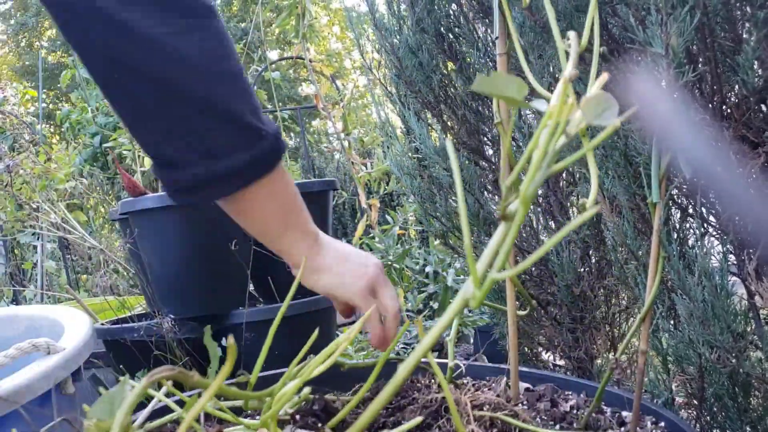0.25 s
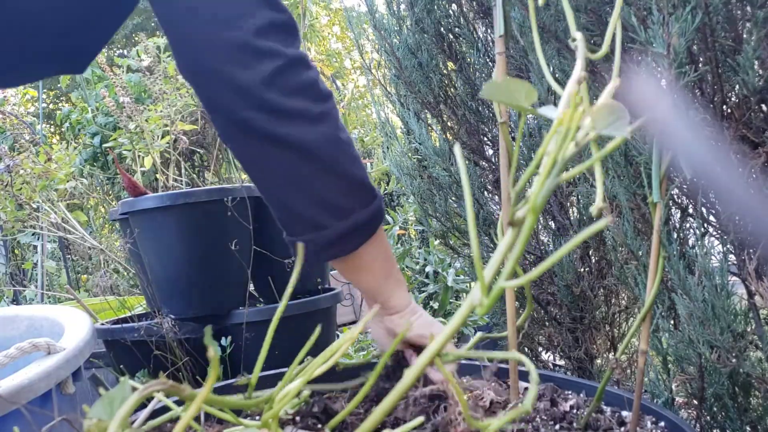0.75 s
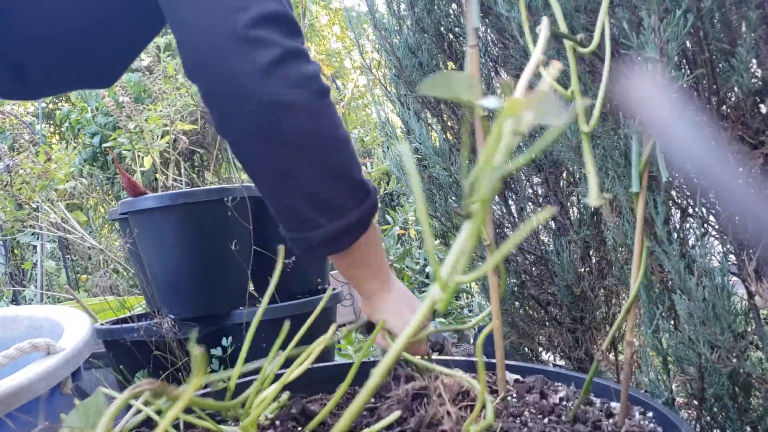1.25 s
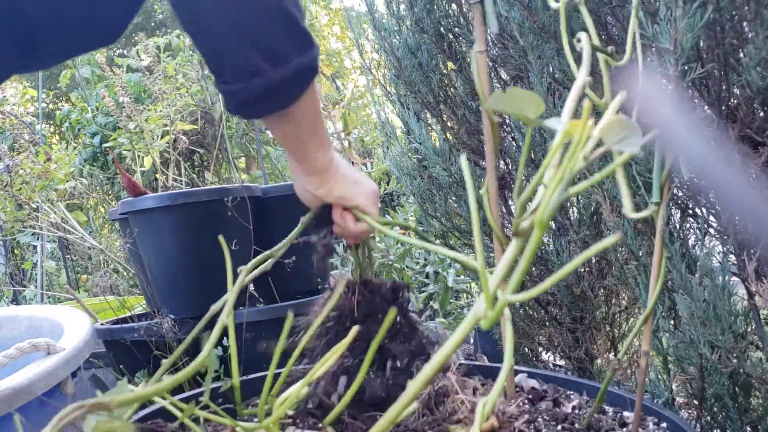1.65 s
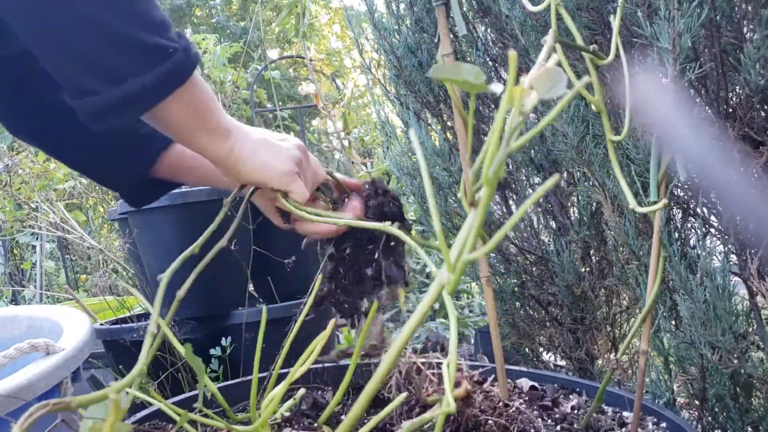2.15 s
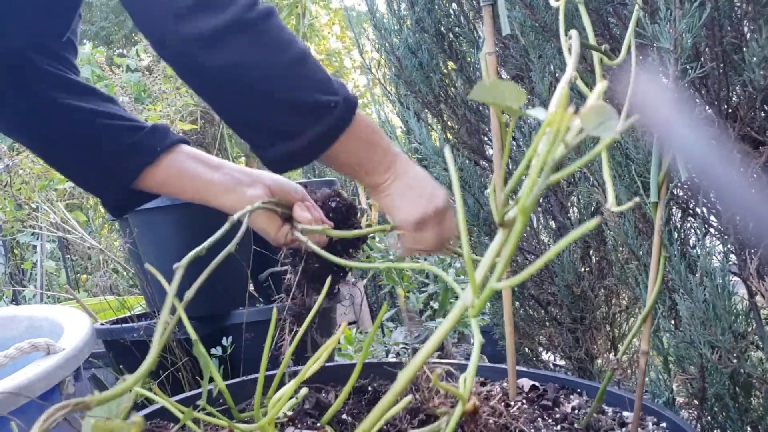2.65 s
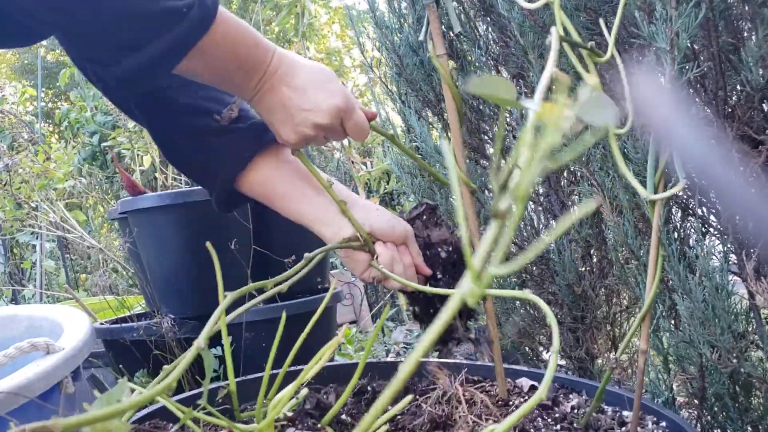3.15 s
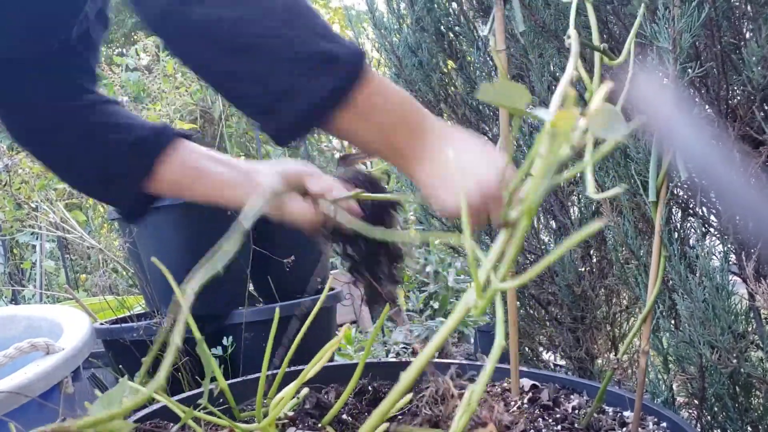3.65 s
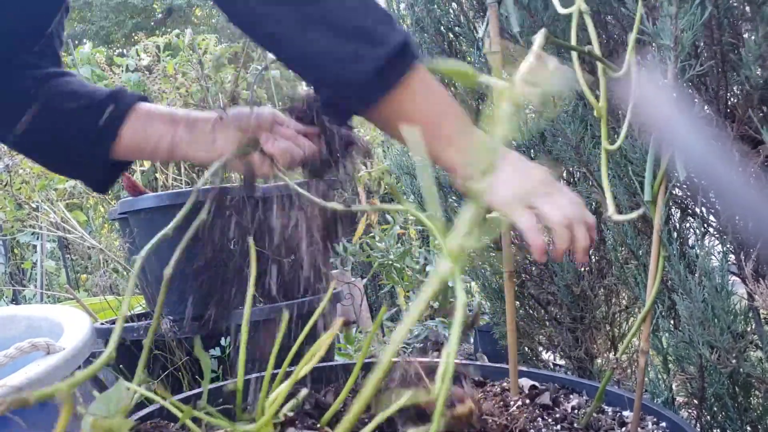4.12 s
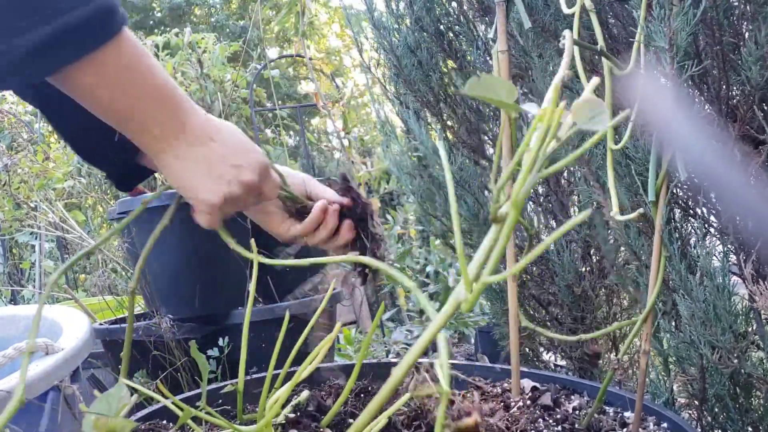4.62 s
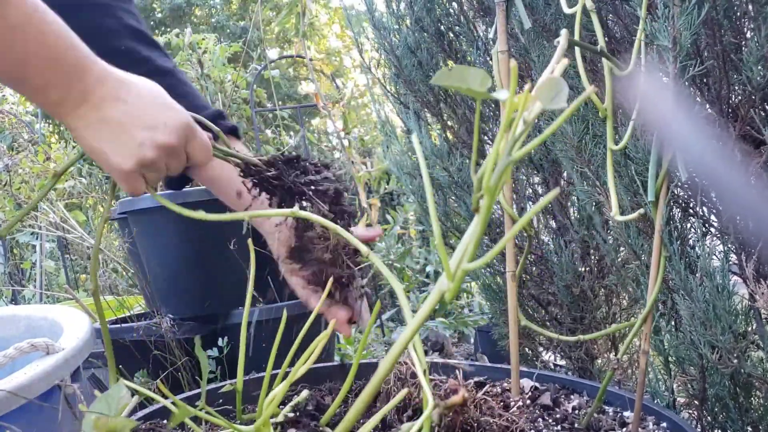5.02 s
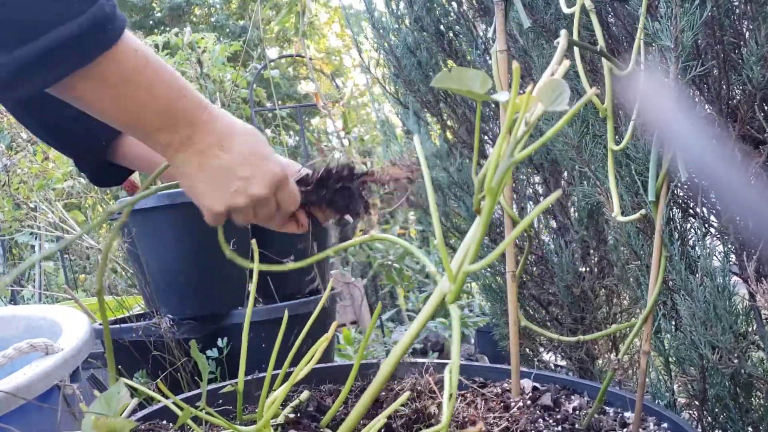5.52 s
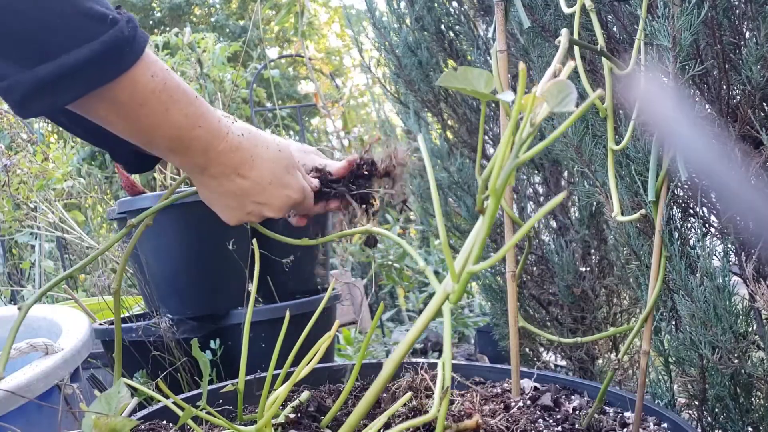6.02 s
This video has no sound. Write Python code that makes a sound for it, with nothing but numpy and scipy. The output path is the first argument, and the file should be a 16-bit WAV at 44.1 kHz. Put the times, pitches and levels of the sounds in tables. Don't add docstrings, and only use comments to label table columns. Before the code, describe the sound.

Outdoors in a garden, a stereo microphone sits close to a soil tub. A distant engine drones steadily over faint town murmur. Leaves rustle as hands grip, then roots snap and earth crumbles, with clods knocking. Wind bumps the right side midway; a hard crack and busy shaking follow, easing into light picking.

```python
import sys
import numpy as np
from scipy import signal
from scipy.fft import rfft, irfft
from scipy.io import wavfile
from scipy.ndimage import uniform_filter1d

SR = 44100
rng = np.random.default_rng(int(sys.argv[2]) if len(sys.argv) > 2 else 0)


def store_wav(level_fs):
    pcm = np.round(np.clip(np.atleast_2d(level_fs), -1, 1) * 32767)
    wavfile.write(sys.argv[1], SR, pcm.T.astype(np.int16))


def voltage_ratio(decibels):
    exponent = np.asarray(decibels, float) / 20
    return 10 ** exponent


N = 276948

# frequency in Hz, level in dB per Hz.
LEAF_LEFT = [(500, 16.5), (900, -17), (1500, -9), (2300, -12.5), (3300, -7.5), (4300, -9), (5900, -12),
             (6800, -1), (8400, -12), (10000, -1.5), (12000, 2), (13500, 2.5), (15500, -2.5)]
# frequency in Hz, level in dB per Hz.
LEAF_RIGHT = [(500, 13), (900, -21), (1500, -12), (2300, -13.5), (3300, -5), (4300, 0), (5900, 2),
              (6800, -0.5), (8400, -21), (10000, -9.5), (12000, 0), (13500, -32.5), (15500, 2)]


def rms_one(x):
    return x / np.sqrt(np.mean(x ** 2) + 1e-20)


def in_time(rows):
    s, *columns = np.transpose(rows)
    return [np.interp(np.arange(N) / SR, s, column) for column in columns]


def at_hz(points, hz):
    point_hz, point_db = np.transpose(points)
    return np.interp(np.log(hz), np.log(point_hz), point_db)


def drift(rate):
    r = np.exp(-80 * np.pi * rate / SR)
    slow = signal.lfilter([1], [1, -2 * r, r * r], rng.standard_normal(N // 40 + 2002))[2000:]
    return np.interp(np.arange(N) / 40, np.arange(len(slow)), rms_one(slow))


def causal(points, size):
    hz = np.arange(size + 1) * SR / 2 / size + 1
    cepstrum = irfft(np.log(voltage_ratio(at_hz(points, hz))))
    cepstrum[1:size] *= 2
    cepstrum[size + 1:] = 0
    return irfft(np.exp(rfft(cepstrum)))[:size]


def ports(x, left, right, size=256):
    responses = [causal(left, size), causal(right, size)]
    return signal.oaconvolve(x, responses, axes=1)[:, :x.shape[1]]


def band(x, low_hz, high_hz, order=3):
    edges_hz = [low_hz, min(high_hz, .45 * SR)]
    return signal.sosfilt(signal.butter(order, edges_hz, "band", fs=SR, output="sos"), x)


def add(out, sound, s):
    i = round(s * SR)
    out[:, i:i + sound.shape[1]] += sound[:, :N - i]


def sides(db):
    return voltage_ratio(np.array([[db / 2], [-db / 2]]))


def swells(rows, rise, sag, fall):
    s, hold, db = np.transpose(rows)[:3, :, None]
    age = np.arange(0, N + 64, 64) / SR - s
    rising = rise * np.minimum(age, 0)
    sagging = sag * np.clip(age, 0, hold)
    falling = fall * np.maximum(age - hold, 0)
    return voltage_ratio(db + rising - sagging - falling)


def blend(gains):
    total = np.sqrt(np.sum(gains ** 2, axis=0))
    return np.interp(np.arange(N) / 64, np.arange(len(total)), total)


def engine():
    # time in seconds, speed as 12th order in Hz, firing level in dB.
    running = [(0.0, 299.2, -41), (0.5, 300.1, -39.5), (1.0, 296.6, -43), (1.25, 298.4, -40),
               (1.75, 293.0, -39.5), (2.25, 298.5, -36.5), (2.75, 297.5, -38), (3.0, 294.0, -40),
               (3.5, 295.3, -38.5), (3.75, 297.2, -36), (4.0, 294.7, -39), (4.5, 300.1, -35),
               (5.0, 305.1, -39), (5.25, 306.2, -47.5), (5.5, 304.0, -46.5), (5.75, 301.1, -39.5),
               (6.0, 301.0, -40.5), (6.28, 303.8, -44.5)]
    # order number, level in dB.
    steady_orders = [(2, -49.5), (5, -48), (6, -52), (7, -55), (10, -93), (13, -66.5), (14, -70.5),
                     (15, -72)]
    # order number, level in dB, depth of fading on the way in dB,
    # share of the firing swing, slope in dB per Hz of overspeed.
    fading_orders = [(3, -52, 1.5, -0.5, -1), (8, -47.5, 1.5, -1.08, -2.5), (9, -64.5, 2.5, 0.96, 2.07),
                     (12, -55, 1.0, 0.13, 0.53)]
    # frequency in Hz, left minus right in dB.
    port_balance = [(50, 6), (170, -1), (215, 11), (260, 8), (300, -1.5), (330, 5)]
    wander_db, lag_rad = 1.0, 0.22
    pipe_top_hz = 299.3

    top_hz, firing_db = in_time(running)
    turn = 2 * np.pi * np.cumsum(top_hz / 12) / SR
    over_hz = np.maximum(top_hz - pipe_top_hz, 0)
    firing_swing_db = firing_db - firing_db.mean()
    orders = steady_orders + [(4, firing_db)]
    for k, db, depth_db, share, slope in fading_orders:
        orders.append((k, db + depth_db * drift(1.2) + share * firing_swing_db + slope * over_hz))

    out = np.zeros((2, N))
    for k, db in orders:
        hz = k * np.mean(top_hz) / 12
        phase = k * turn + np.pi * (k % 4 == 0) + .09 * min(k, 5) * drift(1.5)
        level = np.sqrt(2) * voltage_ratio(db + wander_db * drift(2.14))
        right_gain = voltage_ratio(-at_hz(port_balance, hz))
        out += level * np.sin([phase, phase + lag_rad]) * [[1], [right_gain]]
    return out


def town():
    # frequency in Hz, level in dB per Hz.
    town_left = [(30, 1), (80, 12), (130, 2.5), (300, 2.5), (500, -9), (1000, -21.5), (1450, -10.5),
                 (2300, -27.5), (4300, -35), (6800, -23.5), (8400, -41), (12000, -30.5), (15500, -23)]
    # frequency in Hz, level in dB per Hz.
    town_right = [(30, -8), (80, 21.5), (130, 8.5), (300, 6.5), (500, -12), (1000, -23), (1450, -24),
                  (2300, -25.5), (4300, -17.5), (5900, -22.5), (8400, -96), (12000, -49), (15500, -38)]
    own, shared = rng.standard_normal((2, N)), rng.standard_normal(N)
    low, high = (signal.butter(1, 900, kind, fs=SR) for kind in ("low", "high"))
    air = signal.lfilter(*low, 0.65 * shared + 0.26 * own) + signal.lfilter(*high, own)
    return voltage_ratio(-36) * ports(air, town_left, town_right, size=4096)


def grains(per_s, spread_db, clump_db, count=7):
    heights = voltage_ratio(spread_db * np.minimum(rng.exponential(1, N), 3.3))
    sizes = heights * (rng.random(N) < per_s * voltage_ratio(clump_db * drift(25)) / SR)
    dealt = rng.integers(0, count, N)
    out, t = 0, np.arange(600) / SR
    for k, t60 in enumerate(np.geomspace(.001, .011, count)):
        scatter = rng.standard_normal((2, 600)) * voltage_ratio(-60 * t / t60)
        scatter = rms_one(signal.lfilter([1, 0.95 * (-1) ** k], [1], scatter))
        out = out + signal.oaconvolve((sizes * (dealt == k))[None], scatter, axes=1)[:, :N]
    return rms_one(out)


def rustle():
    # full strength at seconds, hold in seconds, effort in dB,
    # leaf brightness in dB.
    hands = [(0.0, 0.16, -64, 11.5), (0.247, 0.17, -63, -5.5), (0.56, 0.07, -56, 4.5),
             (0.666, 0.089, -45.5, 5), (0.776, 0.082, -53.5, 8.5), (0.91, 0.062, -63, 3),
             (1.03, 0.36, -65, 6), (1.297, 0.013, -51.5, 2.5), (1.378, 0.19, -56.5, 3.5),
             (1.51, 0.24, -56.5, 5), (1.79, 0.18, -55.5, 3), (2.065, 0.082, -55.5, 0.5),
             (2.218, 0.17, -62, 4.5), (2.522, 0.051, -67.5, 3.5), (2.747, 0.088, -53.5, 4),
             (2.942, 0.043, -65, 6.5), (3.071, 0.13, -61.5, 7), (3.33, 0.029, -70.5, 9.5),
             (3.558, 0.049, -65, 4.5), (3.71, 0.13, -68.5, 8), (3.915, 0.047, -54.5, 8.5),
             (4.019, 0.12, -55, 6.5), (4.2, 0.13, -50.5, 6), (4.384, 0.077, -54, 8), (4.524, 0.13, -53, 7),
             (4.67, 0.16, -57.5, 6.5), (4.872, 0.19, -64.5, 7), (5.295, .05, -60.5, 6.5),
             (5.37, 0.013, -56.5, 8), (5.523, 0.035, -61, 6)]
    # full
    # strength at seconds, hold in seconds, # effort in dB, leaf brightness in dB.
    picking = [
        (2.407, 0.33, -68.5, -4),
        (3.24, 0.32, -71, 2.5),
        (5.076, .2, -76.5, 10.5),
        (5.44, .04, -66, -1),
        (5.615, 0.17, -67, 4),
        (5.86, 0.44, -71, 4),
    ]
    moves = swells(hands + picking, rise=337, sag=0.5, fall=172)
    leafy_db = np.array(hands + picking)[:, -1:]
    effort = voltage_ratio(0.8) * blend(moves)
    bright = blend(moves * voltage_ratio(leafy_db - 0.3))
    body = blend(moves * voltage_ratio(0.12 * leafy_db - 8.0))

    hiss = rng.standard_normal((2, N)) * voltage_ratio(1.8 * drift(20) + 2.2 * drift(80))
    ticking = grains(1600, spread_db=4.6, clump_db=4.5)
    raw = ports(ticking + 0.8 * hiss, LEAF_LEFT, LEAF_RIGHT)
    out = effort * rms_one(band(raw, 2600, 8400))
    out += bright * rms_one(band(raw, 8400, 17500))
    crumbs = np.tanh(.7 * rms_one(band(raw, 1100, 2600)))
    return out + body * rms_one(crumbs)


def soil():
    # full strength at seconds, hold in seconds, level in dB.
    shifts = [
        (.45, 0.17, -64),
        (1.0, 0.23, -67),
        (1.36, .12, -54.5),
        (1.7, 0.5, -64),
        (4.05, .3, -62),
        (4.55, 0.23, -60.5),
        (4.9, .2, -70),
        (5.35, 0.074, -75),
        (6.27, .02, -72),
    ]
    crumbs = grains(500, spread_db=1.5, clump_db=4.0, count=3)
    crumbs = crumbs + 0.24 * crumbs[::-1]
    shifting = blend(swells(shifts, rise=89, sag=10, fall=29)) + voltage_ratio(-81)
    return shifting * rms_one(band(crumbs, 304, 770, order=2))


def snaps():
    # start in seconds, peak in dB, brightness in dB,
    # left minus right in dB, ring-out in ms.
    breaks = [(0.5705, -32.5, -14, 0, 16), (0.664, -32.5, -31, -8, 11), (0.6872, -32, -18, -16, 45),
              (0.859, -18, -12.5, 1.5, 24), (1.283, -28, -5, 2, 9.9), (1.2983, -15, -7.5, 3.5, 11),
              (1.3485, -33, -31, 1, 6.5), (1.405, -39.5, -28, -8, 12), (1.5693, -30.5, -5, 7, 26),
              (1.6406, -35, -27, -7.5, 18), (1.716, -27, -7, 20, 5.2), (2.7412, -20.5, -5, 1, 22),
              (2.7628, -25, -10, -9, 12), (2.796, -24.5, -10, -4, 6.8), (2.8098, -24, -8.5, -2, 9.6),
              (3.0793, -26.5, -7, 2, 11), (3.1463, -22, -6, -1.5, 8.5), (3.9039, -11.5, -12, 1.5, 9),
              (3.9765, -22.5, -14, -1.5, 12.4), (4.27, -31, 1, -7, 4.3), (4.305, -17.5, -12, 8, 3),
              (4.6942, -30, -8, 8, 6.5), (5.3795, -20, -7, 10, 4), (5.3975, -16, -8, 4, 12),
              (5.3995, -16, -8, 4, 6)]
    # start in seconds, peak in dB, left minus right in dB.
    stalk_ticks = [(0.9198, -31, 0), (1.0525, -46, 6), (1.071, -32, 28), (1.0997, -33.5, 24),
                   (1.2186, -37, -2), (2.0478, -29, 3), (2.077, -34.5, -2.5), (2.242, -36.5, -12),
                   (2.295, -37.5, 1), (2.381, -29.5, 7), (2.7204, -35, -16), (2.8365, -27, 6),
                   (2.875, -26.5, 8), (2.9407, -42, 11), (3.1142, -29.5, -4), (3.3457, -36, -4),
                   (3.711, -37, -2), (3.804, -30, 6), (4.114, -32, -4), (4.206, -44, -16), (4.454, -35, 4),
                   (4.535, -32, 3), (4.8147, -36, 4.5), (5.3154, -43, 1), (5.514, -34.5, -4),
                   (5.639, -37, 11), (5.771, -36, 3), (5.9204, -42, -14), (6.21, -40, -8), (1.029, -42, 2),
                   (2.49, -45, 0), (5.4215, -38, 2), (5.529, -39, 3), (5.688, -43, 0), (5.733, -42, 2),
                   (6.027, -41, -3)]
    # start in seconds, peak in dB,
    # brightness in dB, left minus right in dB.
    crackles = [(0.5586,-40,-10,2), (0.7114,-30,-26,0), (0.7324,-30,-22,0), (0.7434,-31,-26,0),
                (0.7894,-28,-8,6), (0.8024,-33,-15,3.5), (0.9114,-37,-26,2), (0.9507,-37,-15,2.5),
                (0.9682,-41,-11,3.5), (1.1403,-46,-11,3), (1.259,-44,-6,6), (1.4204,-36,-25,0),
                (1.4748,-33,-26,-2), (1.4905,-31,-15,3), (1.5834,-36,-14,3), (1.7958,-34,-9,4.5),
                (1.8831,-37,-13,1), (1.935,-34,-16,1), (2.3356,-41,-8,4), (2.5436,-43,-30,-4),
                (2.9607,-42,-8,6), (3.1244,-33,-14,4), (3.1767,-40,-8,6), (3.5573,-41,-6,5),
                (4.0332,-36,-16,3), (4.1879,-31,-22,1), (4.2158,-32,-11,3.5), (4.2374,-33,-11,5),
                (4.3545,-28,-6,8), (4.3859,-33,-9,5.5), (4.5042,-34,-16,3), (4.5714,-32,-20,2),
                (4.6024,-36,-15,2.5), (4.6135,-32,-12,2.5), (4.6349,-30,-24,-1), (4.6474,-32,-24,1),
                (4.6768,-31,-24,1), (4.7346,-37,-9,8.5), (4.7611,-33,-13,5), (4.7915,-33,-9,7.5),
                (4.9202,-42,-9,5.5), (4.9314,-42,-17,3.5), (4.9736,-41,-5,9), (5.0315,-40,-16,2),
                (5.37,-33,-6,10), (5.4084,-29,-11,8.5), (5.4625,-43,-7,4), (5.4954,-39,-5,7),
                (5.5383,-33,-10,4), (5.5912,-39,-7,6)]
    events = breaks + [(s, db, -5.5, pan_db, 3.8) for s, db, pan_db in stalk_ticks]
    events = events + [(s, db, bright_db, pan_db - 5, 3.5) for s, db, bright_db, pan_db in crackles]

    out, t = np.zeros((2, N)), np.arange(2600) / SR
    for s, db, bright_db, pan_db, ms in events:
        age = t * 1e3 / np.clip(ms, 1, 40)
        opening = 1 - np.exp(-(age / 0.07) ** 2)
        shape = opening * (voltage_ratio(-45 * age ** 1.4) + voltage_ratio(-24 - 12 * age))
        shape += 2.6 * voltage_ratio(-60 * t / .0014)
        raw = ports(rng.standard_normal((2, len(t))) * shape, LEAF_LEFT, LEAF_RIGHT)
        burst = voltage_ratio(-8) * band(raw, 1800, 13000, order=2)
        burst += band(raw, 4400, 7460, order=2)
        burst += voltage_ratio(min(bright_db, -5) + 14.5) * band(raw, 6760, 16600, order=2)
        burst = burst * sides(pan_db + 3)
        add(out, voltage_ratio(db) * burst / np.abs(burst).max() * 1.29, s)
    return out


def clods():
    # start in seconds, peak in dB, pitch in Hz, ring-out in ms, left minus right in
    # dB.
    knocks = [(0.575, -44.5, 1400, 13, 13), (0.667, -40, 2400, 4.7, 2), (0.775, -44, 1850, 6, 3),
              (0.811, -45, 1500, 4, 2), (1.4905, -40, 1400, 6, 2), (1.759, -44, 1500, 3, 2),
              (4.326, -37, 440, 9, 3), (4.206, -45, 2000, 4, 2), (1.3195, -44, 1700, 10, 8),
              (1.324, -39, 1400, 7.1, 3), (1.35, -31, 1080, 25, 2), (1.4045, -42, 905, 13, -10),
              (1.421, -40.5, 1100, 8.5, 8), (1.475, -38, 1200, 12, 4), (1.672, -52, 1430, 3.1, 1),
              (3.9036, -39, 930, 5.2, 11), (3.9046, -17, 6660, 6.1, -3), (1.2982, -30, 5400, 6.4, -2),
              (4.814, -45, 2200, 5.5, 9), (4.344, -49, 770, 11, 9), (4.106, -48, 850, 20, 7),
              (4.154, -46, 1300, 13, -2), (4.325, -33, 660, 8.4, 4), (4.603, -47, 680, 20, 14.5),
              (4.604, -35, 1770, 7, 6), (4.636, -41, 390, 19, -0.5), (4.829, -40, 1400, 4.5, -2),
              (3.9045, -35, 540, 10, 0), (5.398, -34, 3900, 6, 0),
              (4.535, -42, 3400, 4, 0), (4.27, -37, 3700, 3, 0), (4.762, -41, 2000, 5, 3),
             (4.791, -45, 2000, 4, 2), (4.829, -40, 3300, 3, 0), (4.114, -43, 3500, 4, 0),
             (2.759, -43, 1500, 4, 0), (2.843, -44, 3500, 5, 0), (1.796, -46, 2600, 5, 0),
             (4.611, -42, 1100, 6, 3), (2.242, -47, 2000, 4, 0), (1.479, -42, 900, 6, 3),
             (0.862, -40, 3000, 5, 0), (5.514, -41, 5600, 4, -3), (3.9042, -23, 9000, 4, 4),
             (4.3245, -38, 1400, 4, 3), (1.351, -38, 750, 8, 2), (1.41, -44, 700, 10, 2),
             (1.445, -46, 800, 10, 2)]
    out, t = np.zeros((2, N)), np.arange(2600) / SR
    for s, db, hz, ms, pan_db in knocks:
        touch_s = 0.0023 + 9 / hz
        push = rng.standard_normal((3, len(t))) * voltage_ratio(-60 * t / touch_s) * np.minimum(t / 0.0002, 1)
        push = push[:2] * .4 + push[2]
        r = voltage_ratio(-60e3 / (np.clip(ms, 3, 13) * SR))
        ring = signal.lfilter([1, 0, -1], [1, -2 * r * np.cos(2 * np.pi * hz / SR), r * r], push)
        broad = band(push, max(hz / 1.9, hz - 1000), hz * 2.8, order=2)
        lump = ring / np.abs(ring).max() + .48 * broad / np.abs(broad).max()
        add(out, voltage_ratio(db - 2.5) * lump * sides(pan_db), s)
    return out


def wind():
    # full strength at seconds, hold in seconds, level in dB.
    gusts = [
        (1.0, .05, -61),
        (2.5, 0.39, -56),
        (2.95, 0.42, -47),
        (3.7, 0.25, -52),
        (4.1, 0.2, -48),
        (4.68, .08, -52),
        (5.1, .1, -64),
        (5.4, .1, -78),
        (6.0, .3, -60),
    ]
    # centre in seconds, peak in dB, pitch in Hz, length in ms.
    puffs = [(0.983, -31, 63, 33), (3.009, -20, 81, 6.3), (3.07, -27.5, 89, 11), (3.153, -26, 119, 14),
             (3.188, -27, 74.5, 11), (3.303, -16, 88, 11.5), (3.357, -33.5, 97, 100),
             (3.494, -25.5, 59.7, 52), (3.723, -27, 60.5, 31), (4.787, -29, 56, 32), (5.891, -40, 60, 33)]
    breeze = rms_one(band(rng.standard_normal(N), 38, 95, order=2) * voltage_ratio(3.5 * drift(10)))
    out = (voltage_ratio(10.5) * breeze * blend(swells(gusts, rise=24, sag=7, fall=68)))[None]
    t = np.arange(-.08 * SR, .08 * SR) / SR
    for s, db, hz, ms in puffs:
        bump = np.exp(-(t / ms * 2e3) ** 2 / 2)
        add(out, voltage_ratio(db) * (bump * np.sin(2 * np.pi * hz * t))[None], s - .08)
    return out * voltage_ratio(np.array([[-24.], [0]]))


def scene():
    return engine() + town() + rustle() + soil() + snaps() + clods() + wind()


def band_limit(x):
    return signal.sosfilt(signal.butter(12, 17010, fs=SR, output="sos"), x)


def record(dry):
    x = signal.sosfilt(signal.butter(2, 32, "high", fs=SR, output="sos"), dry)
    top = band(x, 15900, 16850, order=4)
    power = np.sum(top ** 2, axis=0)
    jump = uniform_filter1d(power, size=90) > voltage_ratio(17) * uniform_filter1d(power, size=3000)
    opening = np.minimum(4 * uniform_filter1d(jump * 1., size=300), 1)
    x = signal.sosfilt(signal.ellip(9, .5, 40, 15750, fs=SR, output="sos"), x)
    x = x + voltage_ratio(-13) * top * opening
    x = signal.sosfilt(signal.cheby2(12, 60, 17400, fs=SR, output="sos"), x)
    return band_limit(x)


dry = scene()
out = record(dry)
store_wav(out)
```